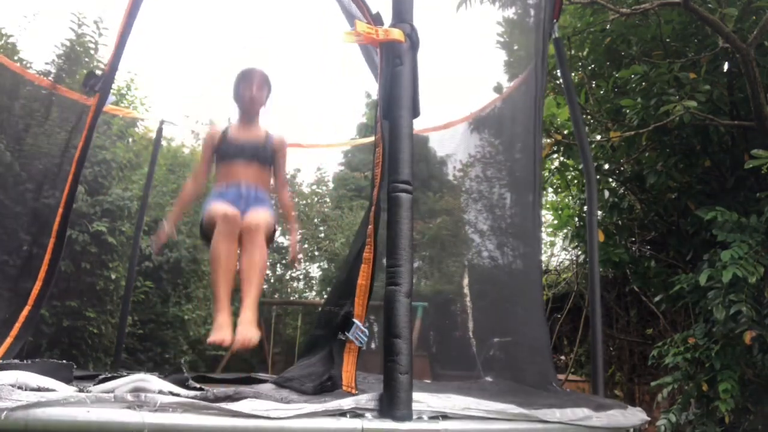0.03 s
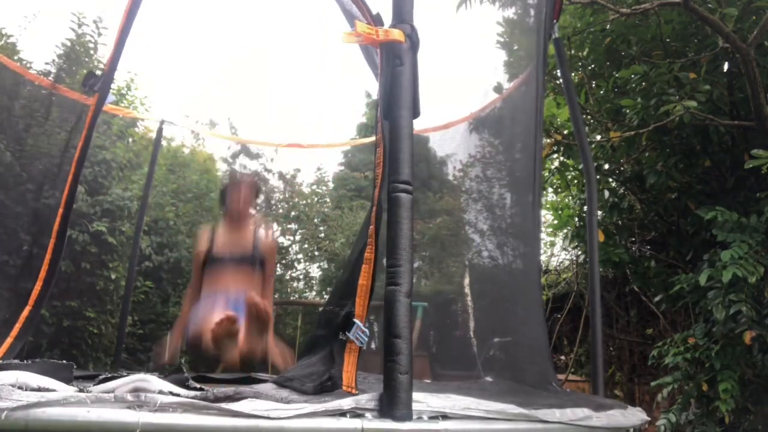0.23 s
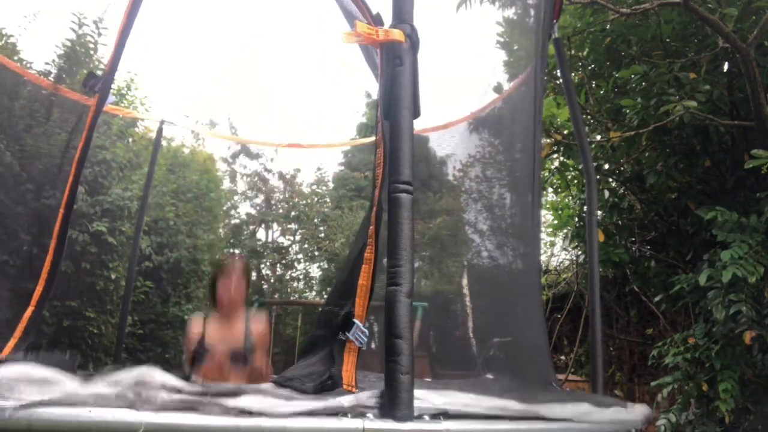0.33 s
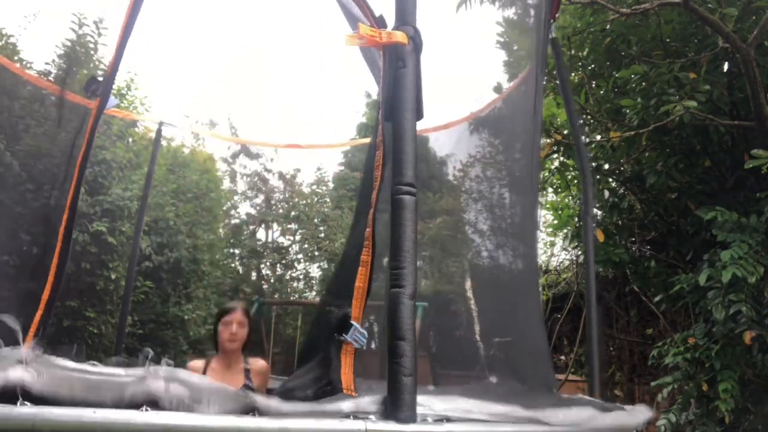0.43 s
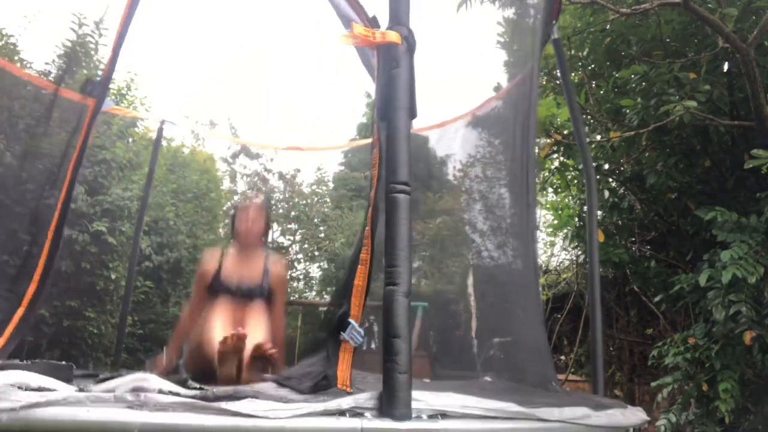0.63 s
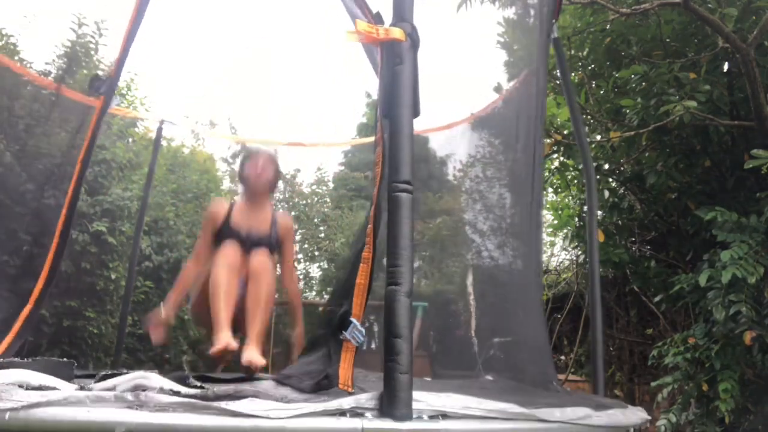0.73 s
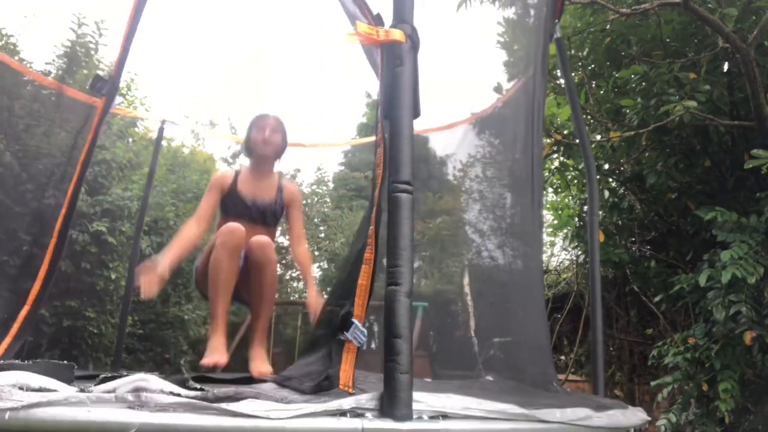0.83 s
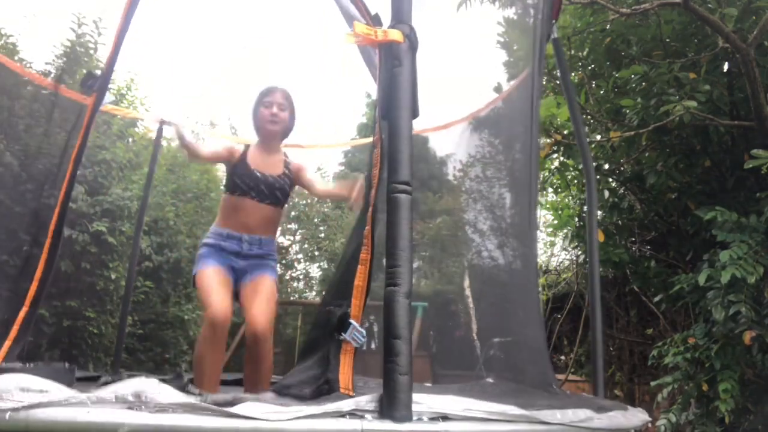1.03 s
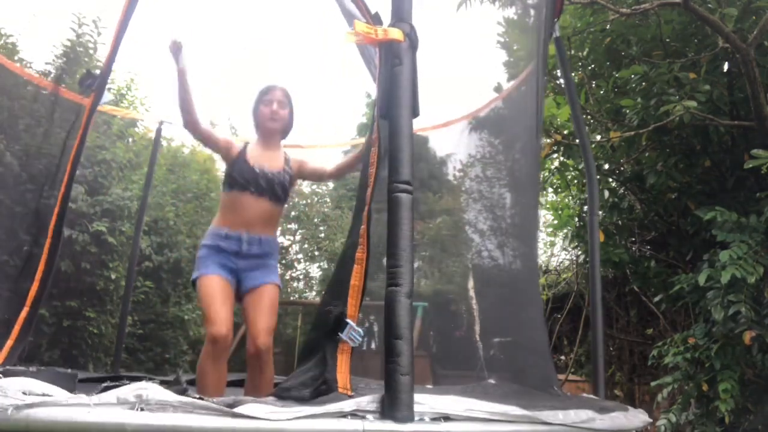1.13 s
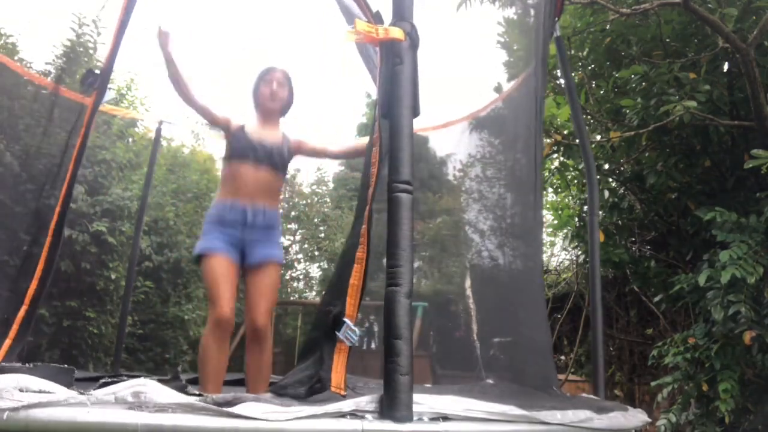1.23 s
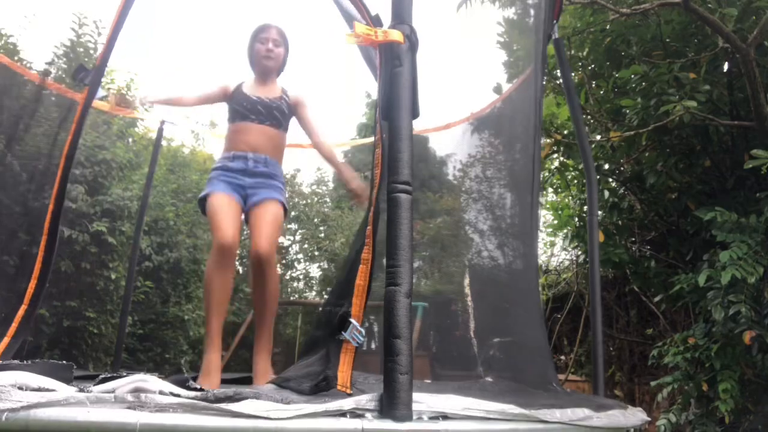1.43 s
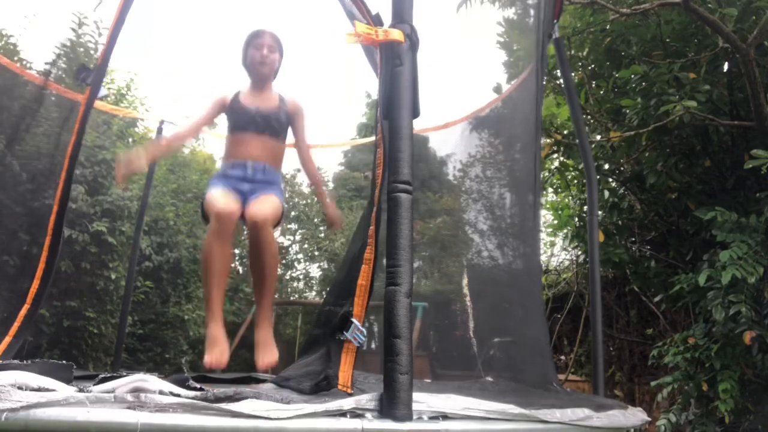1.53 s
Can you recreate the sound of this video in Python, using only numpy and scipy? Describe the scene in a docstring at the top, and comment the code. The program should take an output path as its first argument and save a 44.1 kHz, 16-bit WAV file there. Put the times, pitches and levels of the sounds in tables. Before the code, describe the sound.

Two trampoline bounces outdoors, heard close and dry: a mat slap and thump, loud gritty spring grinding with sharp snaps and brief squeals, a second softer landing and rebound, with a low distant engine behind.

```python
"""In a quiet garden, a child bounces twice on a trampoline, once on her seat and once on her feet.
As the mat sinks and again as it rises, spring hooks grind on the steel frame: dense random clicks through
decaying modes. Some hooks snap (short noise bursts) or squeal (rough rising tones), and the coils ring on.
The mat slaps and thumps softly, made of noise and short sagging tones.
Behind it a far engine, a stack of harmonics, gathers speed over the soft noise of the garden air."""
import sys
import numpy as np
from scipy import signal
from scipy.fft import rfft, irfft
from scipy.io import wavfile
from scipy.ndimage import uniform_filter1d

SR = 44100
rng = np.random.default_rng(int(sys.argv[2]) if len(sys.argv) > 2 else 0)


def materialize(psi):
    """Save the field psi as 16-bit PCM at rate SR to the path in sys.argv[1].

    A 1-D psi becomes a single channel; in a 2-D psi each row is a channel.
    """
    bounded = np.clip(np.atleast_2d(psi).T, -1, 1)
    quanta = np.round(bounded * 32767).astype(np.int16)
    wavfile.write(sys.argv[1], SR, quanta)


N = 70560  # 1.6 s


def undb(db):
    """Turn decibels into a gain."""
    return 10 ** (np.asarray(db) / 20)


def unit(x):
    """Scale to an rms of 1."""
    return x / np.sqrt(np.mean(x ** 2))


def times():
    """Time of every sample in seconds."""
    return np.arange(N) / SR


def noise():
    """White noise with an rms of about 1."""
    return rng.standard_normal(N)


def wander(hz):
    """Smooth random ups and downs with an rms of 1, heading for a new value hz times a second."""
    step = max(int(SR / hz), 2)
    held = np.repeat(rng.standard_normal(N // step + 1), step)
    return unit(uniform_filter1d(held, step)[:N])


def shape(x, gain):
    """Filter by a gain that is a function of frequency."""
    hz = np.maximum(np.fft.rfftfreq(2 * N, 1 / SR), 1)
    return irfft(rfft(x, 2 * N) * gain(hz))[:N]


def colour(x, points):
    """Filter by a curve through (frequency [Hz], gain [dB]) points."""
    hz, db = np.array(points).T
    return shape(x, lambda f: undb(np.interp(np.log(f), np.log(hz), db)))


def high_pass(x, hz):
    """Weaken everything below hz."""
    return signal.sosfilt(signal.butter(2, hz, "high", fs=SR, output="sos"), x)


def fade(start, t60):
    """Sudden start, then an exponential decay that loses 60 dB in t60 seconds."""
    age = times() - start
    return (age >= 0) * np.exp(-np.log(1000) * np.abs(age) / t60)


def swell(start, length):
    """A rounded rise and fall."""
    progress = np.clip((times() - start) / length, 0, 1)
    return np.sqrt(np.abs(np.sin(np.pi * progress)))


DETUNE = 0.014  # share by which the springs differ in pitch


def ring(x, modes):
    """Drive decaying modes, each a close cluster of pitches because no two springs are alike."""
    hz = np.fft.rfftfreq(N, 1 / SR)
    random_phase = np.exp(2j * np.pi * rng.random(len(hz)))
    response = 0
    for centre, t60, db in modes:
        cluster = irfft(random_phase / (1 + ((hz / centre - 1) / DETUNE) ** 2), N)
        response = response + undb(db) * unit(fade(0, t60) * cluster)
    return signal.fftconvolve(x, response / np.sqrt(N))[:N]  # mode levels are shares of the energy


# Ways the frame and hooks vibrate: (pitch [Hz], time to fade by 60 dB [s], relative level [dB])
FRAME_MODES = [(861, 0.031, -4.5), (1093, 0.01, -2.5), (1770, 0.057, -25.5), (2443, 0.032, 0.5),
               (3128, 0.048, 3), (3280, 0.023, -8.5), (3683, 0.073, -5), (4294, 0.048, 1),
               (5360, 0.034, -1.5), (5830, 0.033, -6), (8790, 0.033, -2.5), (9340, 0.032, -10),
               (10760, 0.05, 0), (12620, 0.015, 1)]
# Tone colour of steel contacts: (frequency [Hz], gain [dB])
STEEL_COLOUR = [(300, 11.5), (600, -4.5), (850, -5.5), (1400, -3), (1900, 2), (3300, -0.5), (4800, 1.5),
                (6200, 0), (7500, 1), (9500, 1.5), (11500, -5), (14000, -7.5), (15500, -2)]
FRAME_DB, RATTLE_DB, RATTLE_T60_S = -14.5, -5, 0.038


def steel(x):
    """A contact is heard directly, through the frame's modes and as a short rattle round the rim."""
    rattle_response = unit(noise() * fade(0, RATTLE_T60_S)) / np.sqrt(N)
    rattle = signal.fftconvolve(x, rattle_response)[:N]
    frame = ring(x, FRAME_MODES)
    return colour(x + undb(FRAME_DB) * frame + undb(RATTLE_DB) * rattle, STEEL_COLOUR)


# Loudness of the grinding; one list each for seat sinks, seat rises, feet sink, feet rise:
# (time [s], level of lows [dB], level of mids [dB], level of treble [dB])
STROKES = [
    [(.222, -49, -51.5, -45), (.25, -42, -38, -52), (.257, -37, -27, -17.5), (.28, -30.5, -16, -10),
     (.305, -21, -15, -18), (.352, -22, -12, -11.5), (.39, -26.5, -21, -21.5), (.425, -36, -30, -31.5),
     (.47, -35.5, -32.5, -38)],
    [(.495, -30.5, -29, -25), (.51, -33.5, -21, -20.5), (.535, -33, -20.5, -24.5), (.55, -28.5, -16, -17.5),
     (.58, -27, -24, -28.5), (.625, -31.5, -23.5, -45), (.67, -38, -35.5, -28.5), (.715, -43, -47, -38),
     (.76, -41, -36, -68), (.81, -51.5, -52, -70), (.885, -58, -71, -78)],
    [(.898, -61, -43.5, -48), (.93, -43.5, -36.5, -47), (.943, -36, -28, -26), (.952, -32, -18.5, -11),
     (.977, -32.5, -23.5, -19.5), (.99, -22, -16.5, -18), (1.015, -20.5, -15.5, -18),
     (1.07, -32, -24.5, -23), (1.105, -36.5, -29.5, -30), (1.16, -41, -38.5, -48)],
    [(1.219, -47, -36, -45), (1.226, -37.5, -25, -22.5), (1.248, -31.5, -23, -25.5), (1.285, -31, -22, -23),
     (1.35, -30.5, -21, -19.5), (1.385, -31, -19.5, -14.5), (1.405, -32, -23, -23),
     (1.435, -40.5, -33, -35.5), (1.48, -41.5, -35.5, -46.5), (1.51, -48, -49.5, -56), (1.6, -45, -53, -85)],
]
# Lower edges of the lows, mids and treble: (frequency [Hz])
BAND_EDGES = [620, 1790, 7980]
SLIPS_PER_S, SLIP_SCATTER_DB = 5000, 3.0
JUDDER_HZ, JUDDER_DB = 159.1, 1.4  # random unevenness of the clicks


def grinding():
    """Hooks stick and slip in dense clicks; the lows come in when the load is greatest."""
    happens = rng.random(N) < SLIPS_PER_S / SR
    direction = rng.choice([-1, 1], N)
    strength = undb(SLIP_SCATTER_DB * np.minimum(rng.exponential(size=N), 4))
    slips = happens * direction * strength
    sound = steel(slips * undb(JUDDER_DB * wander(JUDDER_HZ)))

    def above(f, edge):
        """Gain that lets through what lies above the edge."""
        return 1 / (1 + (edge / f) ** 6)

    curve = np.vstack(STROKES)
    moments = np.sort(curve[:, 0])
    out = 0
    for k, (low, high) in enumerate(zip(BAND_EDGES, BAND_EDGES[1:] + [SR])):
        band = unit(shape(sound, lambda f: above(f, low) - above(f, high)))
        out = out + band * undb(np.interp(times(), moments, curve[:, k + 1], left=-90))
    return out


# A hook snaps or ticks: (time [s], level before the steel shapes it [dB], treble tilt [dB per octave])
SNAPS = [(0.127, -37, 12.5), (.334, -25, -7.5), (0.341, -11, -7), (0.3488, -1.5, -3), (0.368, -5.5, -1.5),
         (0.429, -21.5, 9.5), (0.54, -12, 0.5), (0.622, -18.5, -1), (0.67, -12, 1.5), (0.755, -31, -6),
         (0.841, -38.5, 14.5), (.894, -29, -7), (1.061, -13, 7), (1.122, -24, -5), (1.189, -28.5, 0),
         (1.369, -11.5, 1), (1.383, -18, 8), (1.396, -14, 3)]
SNAP_T60_S, SNAP_LOW_HZ = 0.018, 700


def snaps():
    """Single hooks jump in their holes: each is a short noise burst that drives the steel."""
    bursts = 0
    for start, db, tilt in SNAPS:
        burst = noise() * fade(start, SNAP_T60_S)
        # the tilt turns about 6 kHz
        tilted = shape(burst, lambda f: undb(tilt * np.log2(np.clip(f, 1500, 13000) / 6000)))
        bursts = bursts + undb(db) * tilted
    return high_pass(steel(bursts), SNAP_LOW_HZ)


# A hook sticks and squeals:
# (time [s], length [s], pitch halfway [Hz], level [dB], level of the octave above the tone [dB])
SQUEALS = [(.254, 0.0097, 3080, -17.5, -22), (0.256, 0.012, 5300, -18, -30),
           (0.262, 0.023, 6450, -20.5, -2), (0.497, 0.003, 2730, -15, -4), (.5, 0.0054, 3130, -11, -1.5),
           (.504, .007, 3343, -8, -14), (.508, 0.011, 3590, -20.5, -3.5), (0.512, 0.026, 13000, -14, -60),
           (.959, .014, 2135, -19, -10)]
SQUEAL_RISE_HZ_PER_S = 9000
PITCH_SCATTER_HZ, SQUEAL_ROUGH_DB, SCATTER_RATE_HZ = 61, 3.5, 596.9


def squeals():
    """For a few milliseconds a hook slips regularly: a rough tone that rises with the tension."""
    out = 0
    for start, length, hz, db, octave_db in SQUEALS:
        rise = SQUEAL_RISE_HZ_PER_S * np.clip(times() - start - length / 2, -length, length)
        pitch = hz + rise + PITCH_SCATTER_HZ * wander(SCATTER_RATE_HZ)
        phase = 2 * np.pi * np.cumsum(pitch) / SR
        octave = (hz < SR / 4) * undb(octave_db) * np.sin(2 * phase)  # left out if too high
        tone = np.sqrt(2) * (np.sin(phase) + octave)
        level = undb(db + SQUEAL_ROUGH_DB * wander(SCATTER_RATE_HZ))
        out = out + swell(start, length) ** 2 * level * tone
    return out


# Lasting ring of the springs: (pitch [Hz], time to fade by 60 dB [s], relative level [dB])
COIL_MODES = [(3022, 1, -3.5), (3100, 0.99, -8), (3280, 1, -10.5), (3457, 0.35, 1), (3723, 0.68, 0.5),
              (8170, 0.19, 2.5)]
COIL_DB, COIL_IDLE_DB = -26.5, -52.5
COIL_EARLIER_DB, COIL_EARLIER_T60_S = -42.5, 0.22  # ring left over at the start
COIL_FLUTTER_HZ, COIL_FLUTTER_DB = 70.2, 2.0


def coils(contacts):
    """Springs ring after every contact and never quite come to rest; the ring flutters as they sway."""
    # played backwards, the shiver is already in full swing at the start
    shiver = unit(ring(noise(), COIL_MODES[:3])[::-1])
    leftover = undb(COIL_EARLIER_DB) * fade(0, COIL_EARLIER_T60_S)
    rest = shiver * (undb(COIL_IDLE_DB) + leftover)
    flutter = undb(COIL_FLUTTER_DB * wander(COIL_FLUTTER_HZ))
    return (undb(COIL_DB) * ring(contacts, COIL_MODES) + rest) * flutter


# The mat thumps and flaps: (time [s], middle pitch [Hz], length [s], level [dB])
THUMPS = [(0.213, 196.5, 0.016, -17.5), (.226, 600, 0.0061, -25), (0.23, 79, 0.015, -15.5),
          (.32, 83, 0.016, -22), (0.407, 364, 0.0075, -24), (0.413, 97, 0.021, -25),
          (0.449, 234, 0.008, -17.5), (1.233, 414, 0.0058, -21.5), (1.54, 272, 0.0066, -29)]
THUMP_SAG = 0.22  # share by which the pitch starts above and ends below its middle


def thumps():
    """The heavily damped mat gives short tones that sag in pitch."""
    out = 0
    for start, hz, length, db in THUMPS:
        age = np.clip(times() - start, 0, length)
        cycles = hz * age * (1 + THUMP_SAG * (1 - age / length))
        out = out + undb(db) * swell(start, length) * np.sin(2 * np.pi * cycles)
    return out


# Cloth and skin slap the mat: (time [s], level [dB])
SLAPS = [(0.212, -23), (0.2142, -17.5)]
# Tone colour of the slap: (frequency [Hz], relative gain [dB])
SLAP_COLOUR = [(200, 14.5), (600, -10), (1100, 6.5), (1450, -5.5), (2300, 0), (3500, -4.5), (8000, -16.5),
               (15000, -28)]
SLAP_T60_S = 0.036


def slaps():
    """Landing on the mat gives coloured noise that starts suddenly and fades fast."""
    slap = unit(colour(noise(), SLAP_COLOUR))
    return slap * sum(undb(db) * fade(start, SLAP_T60_S) for start, db in SLAPS)


# Course of the far engine: (time [s], firing rate [Hz], level [dB])
ENGINE = [(0, 59.2, -54), (0.101, 59, -38.5), (0.498, 66.78, -37), (.65, 67.98, -42), (0.979, 71.9, -42),
          (1.3, 79.13, -44.5), (1.6, 82.2, -46)]
# Its harmonics: (multiple of the firing rate, relative level [dB])
ENGINE_HARMONICS = [(1, -0.5), (2, -7), (3, -12), (4, -7.5), (5, -12.5)]
ENGINE_ROUGH_DB = 0.5


def engine():
    """A far engine speeds up; its harmonics follow the slightly uneven firing rate."""
    moments, hz, db = np.array(ENGINE).T
    firing_hz = np.interp(times(), moments, hz) * (1 + 0.0071 * wander(19.8))
    phase = 2 * np.pi * np.cumsum(firing_hz) / SR
    tone = 0
    for multiple, harmonic_db in ENGINE_HARMONICS:
        level = undb(harmonic_db + ENGINE_ROUGH_DB * wander(12.04))
        tone = tone + level * np.sin(round(multiple) * phase + 2 * np.pi * rng.random())
    return unit(tone) * undb(np.interp(times(), moments, db))


# Tone colour of garden air and far traffic: (frequency [Hz], relative gain [dB])
GARDEN_COLOUR = [(20, -39), (38, -32), (55, 8), (90, -5.5), (160, -7), (280, -11), (450, -12),
                 (1000, -22.5), (2000, -23.5), (4000, -26.5), (5500, -31.5), (10000, -39.5), (16000, -38)]
GARDEN_DB = -42


def garden():
    """Air and far traffic blend into steady coloured noise."""
    return undb(GARDEN_DB) * unit(colour(noise(), GARDEN_COLOUR))


def scene():
    """Trampoline close by, engine and garden behind."""
    contacts = grinding() + snaps() + squeals()
    trampoline = contacts + coils(contacts) + thumps() + slaps()
    return (trampoline + engine() + garden())[None]


LOW_CUT_HZ, TOP_HZ, CLIP_LEVEL = 57, 15750, .85


def record(dry):
    """The recorder thins the deepest bass, clips the highest peaks and cuts the top."""
    clipped = np.clip(high_pass(dry, LOW_CUT_HZ), -CLIP_LEVEL, CLIP_LEVEL)
    return signal.sosfilt(signal.ellip(10, .2, 80, TOP_HZ, fs=SR, output="sos"), clipped)


dry = scene()
out = record(dry)
materialize(out)
```